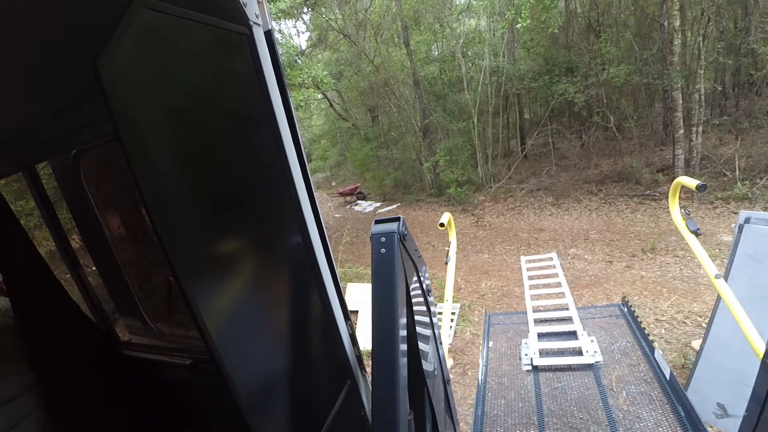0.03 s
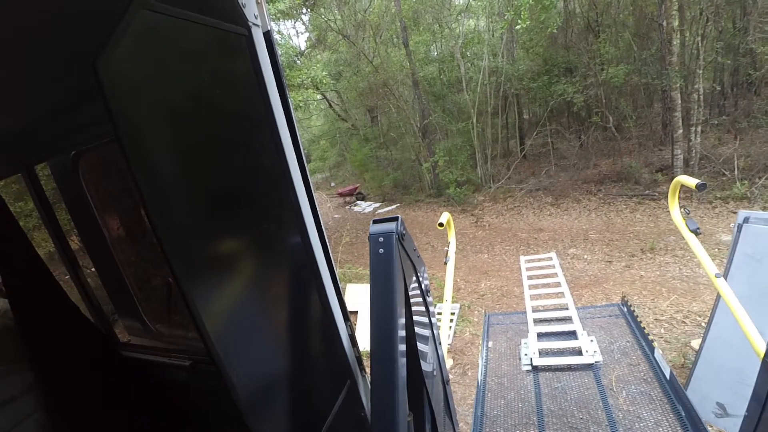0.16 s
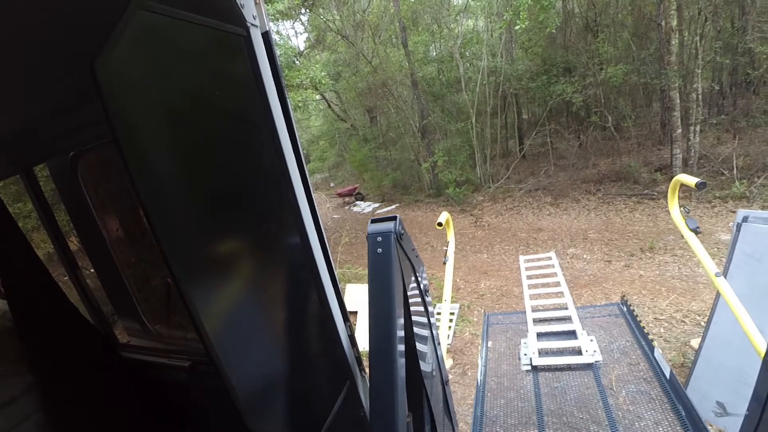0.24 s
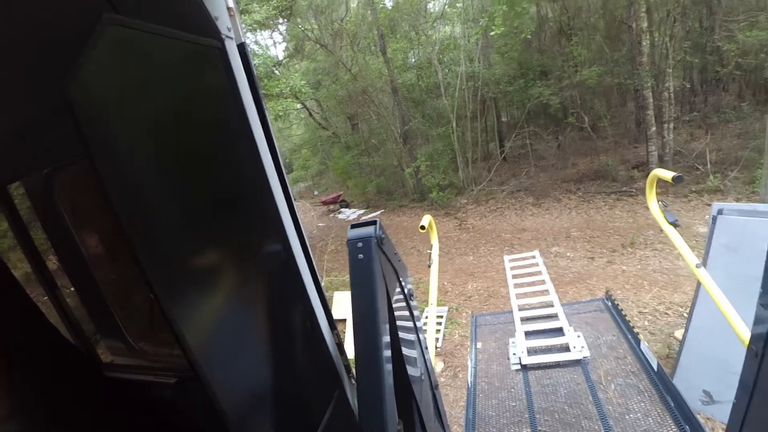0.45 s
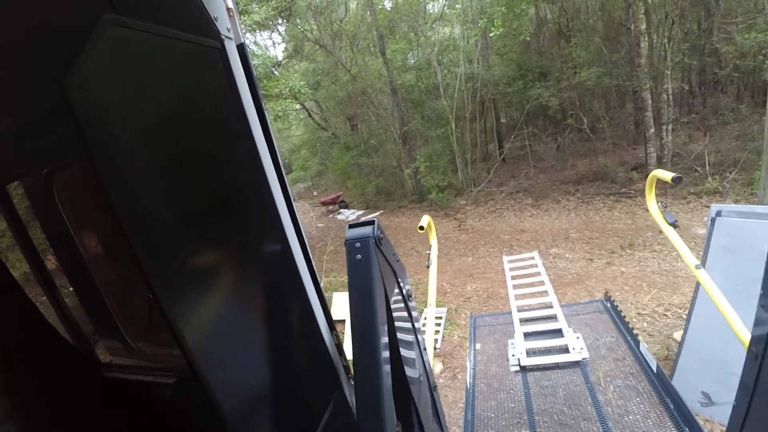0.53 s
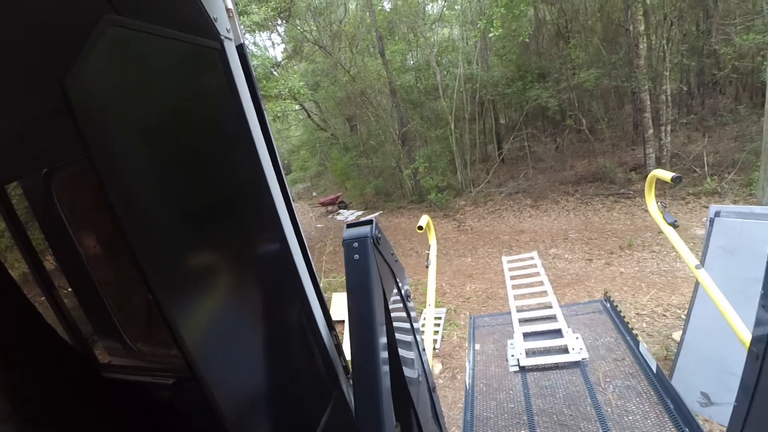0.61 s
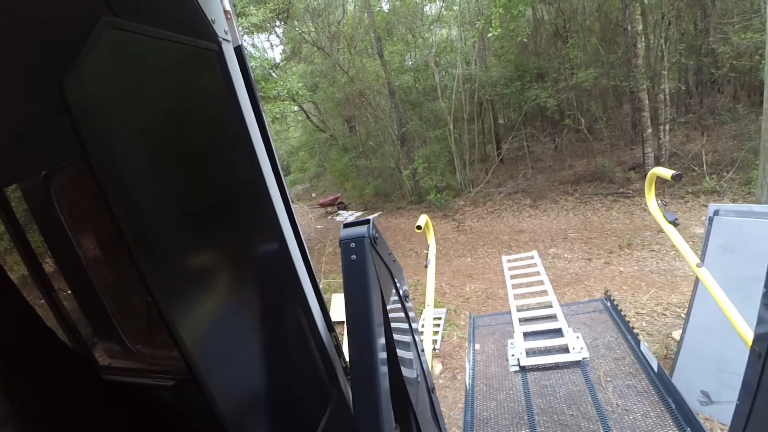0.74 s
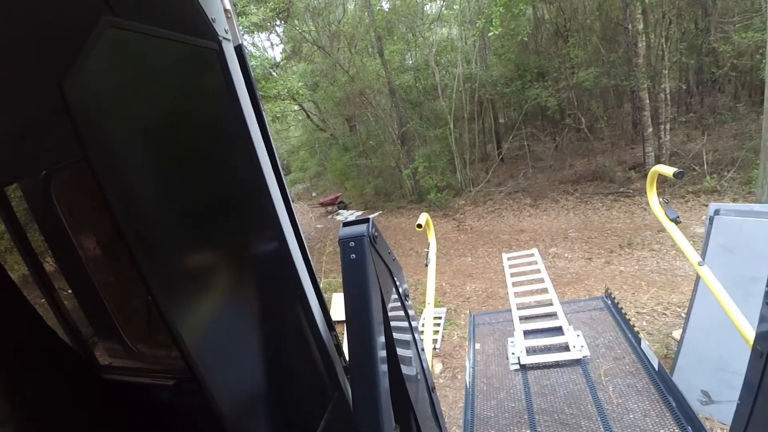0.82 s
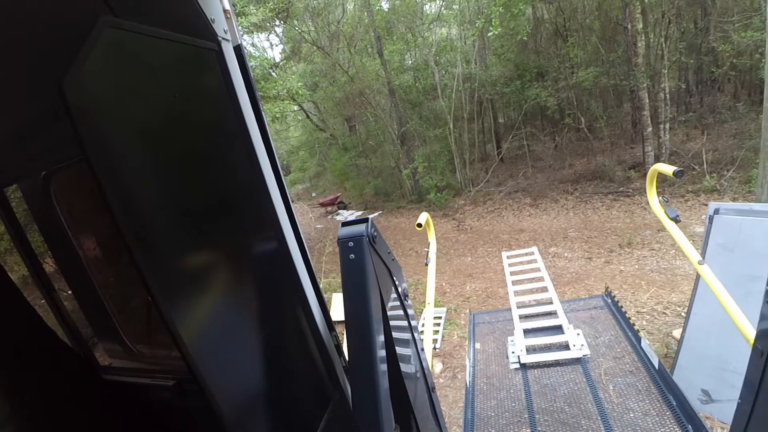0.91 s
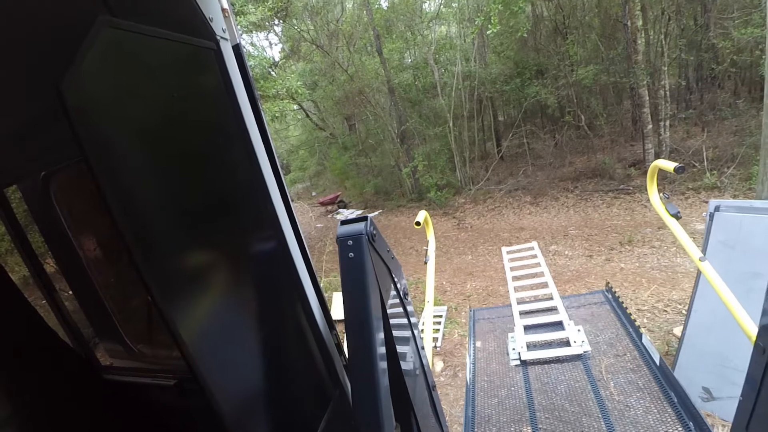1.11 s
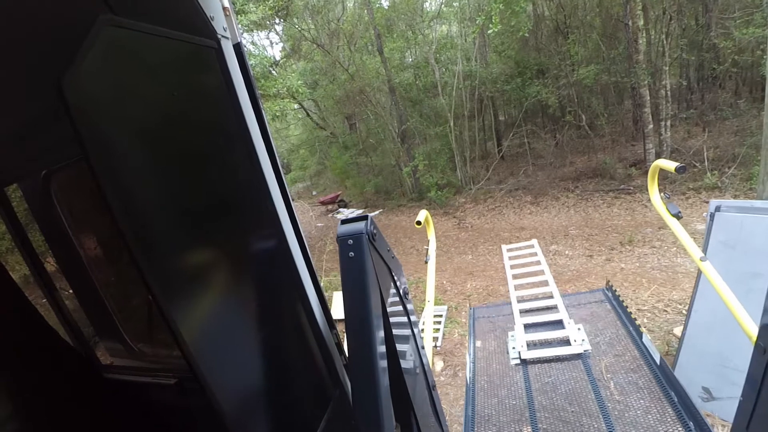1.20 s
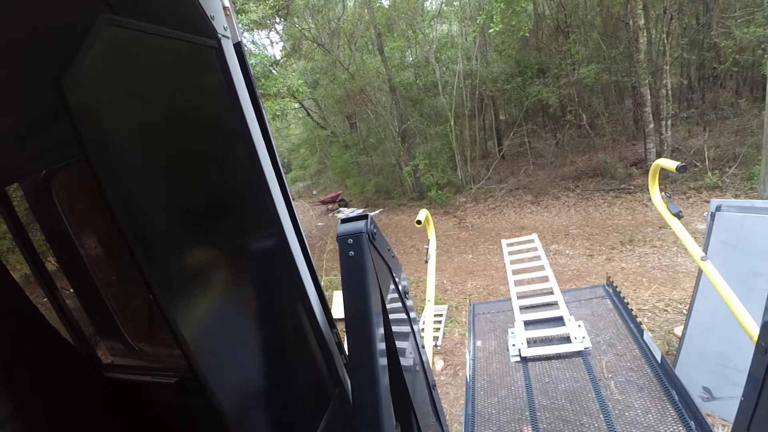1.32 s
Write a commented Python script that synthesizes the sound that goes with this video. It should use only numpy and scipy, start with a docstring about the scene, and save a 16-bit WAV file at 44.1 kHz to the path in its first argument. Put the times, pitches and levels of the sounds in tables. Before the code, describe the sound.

An electric motor driving a vehicle's lift platform starts with a switch click and rises to a whine by 0.3 seconds. Steel linkage clanks from 0.2 to 0.4 seconds, ending in a snap, with low body rumble. A chink comes at 0.5 and light knocks around 0.75. From 0.8 to about 1.4 seconds the motor sags in pitch and grinds under load, heard from the open doorway.

```python
"""Over a faint rumble a switch chinks, and the electric motor of a vehicle's lift platform spins up to a
whine, its gear and commutator tones all multiples of the shaft rate. The steel linkage clanks as the slack
is taken up, ringing the modes of the frame, and the vehicle's body rumbles after each jolt. A catch snaps,
joints chink and knock, and the motor sags and grinds as it takes the load.
Heard in mono from the open doorway."""
import sys
import numpy as np
from scipy.fft import rfft, irfft, next_fast_len
from scipy.io import wavfile
from scipy.ndimage import uniform_filter1d, map_coordinates

SR = 44100
rng = np.random.default_rng(int(sys.argv[2]) if len(sys.argv) > 2 else 0)


def bounce(signal):
    """Save signal as a 16-bit WAV file at the path given by the first command-line argument."""
    frames = np.transpose(np.atleast_2d(signal))
    limited = np.clip(frames, -1, 1)
    pcm = np.round(limited * 32767).astype(np.int16)
    wavfile.write(sys.argv[1], SR, pcm)


N = 59535

# envelope of the body's rumble (time [s], level [dB])
RUMBLE_ENVELOPE = [(0, -58), (.05, -44), (.19, -40), (.235, -24), (.38, -23), (.48, -27), (.58, -38),
                   (.72, -37), (.8, -25), (.9, -31), (1.05, -41), (1.13, -37), (1.35, -41)]
# light steel chinks, the first two from the switch (time [s], level [dB])
CHINKS = [(0.02, -48), (0.0466, -31), (0.5001, -22), (0.509, -25)]
# linkage impacts (time [s], frame level [dB], clatter level [dB])
CLANKS = [(.2135, -15.5, -17), (.2215, -19.5, -28), (.246, -58, -25), (.2885, -26, -16.5),
          (0.2935, -26, -14.5), (.3055, -10.5, -17), (.349, -26, -25), (.369, -22, -30)]
# lighter knocks of a joint as the load comes on (time [s], level [dB])
KNOCKS = [(0.715, -27.5), (0.728, -26), (0.746, -47), (.767, -27.5), (0.774, -30.5)]

# motor shaft (time [s], speed [turns/s])
SHAFT_SPEED = [(.04, 12), (.085, 34.5), (.11, 46), (.135, 54.5), (.155, 57.5), (.2, 70.3), (.24, 76.7),
               (.32, 80.5), (.4, 81.67), (.5, 82.03), (.6, 81.95), (.65, 81.72), (.76, 81.6), (.81, 80.8),
               (.88, 78.5), (.96, 75.1), (1.04, 72.8), (1.16, 70.3), (1.35, 68.8)]
# load on the shaft (time [s], share [0-1])
LOAD = [(.78, 0), (1.1, 0.61)]
# gear and commutator tones (order [cycles/turn])
WHINE_ORDERS = [6, 11, 18, 23, 30, 36, 60, 72, 81, 94, 107, 108, 109, 122, 144, 166, 180, 181, 216]
# strength of each of those tones (free-running level [dB], full-load level [dB])
WHINE_LEVELS = [(-46, -44.5), (-71.5, -36), (-56.5, -58), (-50, -47), (-95, -60), (-53.5, -49.5),
                (-71, -43.5), (-54.5, -48), (-56.5, -65.5), (-57, -53.5), (-83, -75), (-52.5, -64),
                (-64.5, -36), (-66.5, -56), (-57, -50.5), (-65, -57), (-64, -51), (-60, -53), (-74, -44)]
# envelope of the gear mesh during acceleration (time [s], level [dB])
MESH_ENVELOPE = [(.05, -52), (.085, -42), (.11, -43), (.142, -43), (.17, -53), (.22, -63)]
# motor effort, scaling buzz, hiss, hum and grind (time [s], gain [dB])
EFFORT = [(.04, 1), (.11, -2), (.2, 1.5), (.4, 2.5), (.6, 0), (.8, 0.5), (.95, -2), (1.15, -1.5),
          (1.35, -1)]

# resonances that the motor drives (frequency [Hz], width [Hz], gain [dB])
HOUSING_PEAKS = [(795, 70, 8), (1280, 110, 6), (5560, 130, 7), (8420, 90, 7), (8865, 100, 12),
                 (14700, 90, 6)]
COVER_PEAKS = [(795, 55, 12), (1275, 70, 10), (2690, 130, 12)]
PANEL_PEAKS = [(233.3, 10, -3.5), (441.3, 26.5, 5), (516, 35, -10), (576, 70, -5), (682, 86, -11.5),
               (760, 66, -14)]
GRIND_PEAKS = [(176, 53, 5.5), (488, 230, 0.5), (1190, 37, -20), (2126, 56, -1.5), (2410, 40, -2),
               (2700, 32, -1), (3200, 500, -7.5), (4920, 150, -4)]

# modes of the struck parts (frequency [Hz], relative level [dB], 60 dB decay time [s])
SWITCH_MODES = [(4200, -6, .15), (5700, 0, .22), (8220, -5, .2), (11000, -11, .2)]
FRAME_MODES = [(405.4, -13, 0.66), (476, -4, 0.15), (538.6, 0.5, 0.13), (663.3, 7, 0.076), (713, 7.5, 0.05),
               (815, -5.5, 0.22), (866, -3, 0.12), (950, -12, 0.17), (1182, -9.5, 0.21), (1612, -1, 0.042),
               (2002, -8, 0.082)]
CATCH_MODES = [(3600, -5, .011), (3920, 0, .015), (4150, -5, .011), (7000, -8, .009), (8000, -13, .009)]

# spectral shaping of the noisy sources (frequency [Hz], relative gain [dB])
RUMBLE_COLOUR = [(12, -20.5), (24, 8), (42, -3), (62, -11.5), (100, -8.5), (130, -12), (165, -25),
                 (400, -22.5), (1500, -67)]
CHINK_COLOUR = [(100, -10), (500, 6), (1200, -2), (2500, -1), (3600, 0.5), (4800, 3.5), (6500, -5),
                (8500, -15), (11000, -10.5), (16000, -31)]
BUZZ_COLOUR = [(30, -11), (300, -25), (450, 10.5), (700, 2.5), (1100, -9.5), (2500, -16.5), (4000, -8.5),
               (8000, -15), (10000, -12), (16000, -25)]
HISS_COLOUR = [(30, -19), (280, -14), (440, -1.5), (750, -2.5), (1100, -6), (2500, -12.5), (5000, -19.5),
               (8200, -15), (9500, -25), (16000, -21.5)]
CLATTER_COLOUR = [(60, -11), (250, 2), (450, 17), (800, 6.5), (1100, 6.5), (2000, 3.5), (3700, -0.5),
                  (5000, -5.5), (8000, -13), (11000, -22.5), (16000, -33)]
KNOCK_COLOUR = [(100, -27), (250, -5), (600, 8.5), (980, 8), (1350, 3), (1900, -0.5), (2800, -5),
                (4500, -7.5), (7000, -18), (14000, -45)]

ON_S, ON_RISE_S = 0.039, 0.0051
FULL_SPEED = 80  # turns/s
JITTER, LOAD_JUDDER = .0004, .0028  # shares of shaft speed
FLUTTER_DB, LOAD_FLUTTER_DB = 1.8, 1.2
BUZZ_DB, HISS_DB, HUM_DB, GRIND_DB = -41, -38.5, -41, -34.5


def amp(db):
    """Amplitude ratio of a level in decibels."""
    return 10 ** (np.asarray(db) / 20)


def unit(x):
    """Normalisation to rms 1."""
    return x / np.sqrt(np.mean(x ** 2) + 1e-20)


def curve(rows):
    """Linear interpolation of (time [s], value) points at every sample."""
    return np.interp(np.arange(N) / SR, *np.transpose(rows))


def since(start):
    """Elapsed time in seconds, zero before start."""
    return np.maximum(np.arange(N) / SR - start, 0)


def wobble(rate):
    """Smooth random modulation: a spline through rate knots a second."""
    return map_coordinates(rng.standard_normal(1024), [np.arange(N) * rate / SR], mode="mirror")


def filtered(x, response):
    """Linear filtering: the spectrum is multiplied by a frequency response."""
    size = next_fast_len(N + SR // 4)
    return irfft(rfft(x, size) * response(np.fft.rfftfreq(size, 1 / SR)), size)[:N]


def coloured(x, colour):
    """Spectral shaping by (frequency [Hz], gain [dB]) points, at rms 1."""
    hz, db = np.transpose(colour)
    return unit(filtered(x, lambda f: amp(np.interp(np.log(f + 1), np.log(hz + 1), db))))


def resonant_noise(peaks):
    """Random excitation of resonances, at rms 1."""
    response = lambda f: sum(amp(db) / (1 + 1j * (f - hz) / width) ** 2 for hz, width, db in peaks)
    return unit(filtered(rng.standard_normal(N), response))


def burst(start, colour, rise_s, t60):
    """Modal overlap: dense metal ringing merges into exponentially decaying noise."""
    t = since(start)
    envelope = (1 - np.exp(-t / rise_s)) * np.exp(-np.log(1000) * t / t60)
    return envelope * coloured(rng.standard_normal(N), colour)


def ring(start, modes, rise_s):
    """Free vibration: a struck part sounds as a sum of damped sinusoids."""
    t = since(start)
    partials = sum(amp(db) * np.exp(-np.log(1000) * t / t60) * np.sin(2 * np.pi * (hz * t + rng.random()))
                   for hz, db, t60 in modes)
    return partials * (1 - np.exp(-t / rise_s))


def body_rumble():
    """Low-frequency random vibration of the vehicle's body swells after each jolt."""
    return amp(curve(RUMBLE_ENVELOPE)) * coloured(rng.standard_normal(N), RUMBLE_COLOUR)


def steel_chinks():
    """Brief contacts in the switch and joints excite a broad, bright band of modes."""
    return sum(amp(db) * burst(start, CHINK_COLOUR, rise_s=.0007, t60=0.12) for start, db in CHINKS)


def switch_ring():
    """The switch's metal rings briefly at its natural frequencies."""
    return amp(-42) * ring(ON_S, SWITCH_MODES, ON_RISE_S)


def whine(speed, turns, load):
    """Gear and commutator harmonics of the shaft rate swell as they cross housing resonances."""
    tones = np.zeros(N)
    for order, (free_db, loaded_db) in zip(WHINE_ORDERS, WHINE_LEVELS):
        level_db = free_db + load * (loaded_db - free_db)
        lift_db = sum(db / (1 + (2 * (order * speed - hz) / width) ** 2) for hz, width, db in HOUSING_PEAKS)
        flutter_db = (FLUTTER_DB + LOAD_FLUTTER_DB * load) * wobble(39.2)
        harmonic = np.sqrt(2) * np.sin(2 * np.pi * (order * turns + rng.random()))
        tones += amp(level_db + lift_db + flutter_db) * harmonic
    # amplitude grows as the fourth power of speed running free, less steeply under load
    return tones * (speed / FULL_SPEED) ** (4 * (1 - load))


def gear_mesh(turns, order=23):
    """Swept excitation: the rising mesh tone and its octave ring one cover after another."""
    phase = 2 * np.pi * order * turns
    envelope = amp(curve(MESH_ENVELOPE) + FLUTTER_DB * wobble(140))
    mesh = envelope * (np.sin(phase) + amp(-11) * np.sin(2 * phase))
    covers = lambda f: 1 + sum(amp(db) / (1 + 2j * (f - hz) / width) for hz, width, db in COVER_PEAKS)
    return filtered(mesh, covers)


def reflected(x, count=10, longest_s=.022, each_db=-17):
    """Interference with reflections off the door and platform makes a gliding tone ripple."""
    delays = longest_s * rng.random(count)
    return filtered(x, lambda f: 1 + amp(each_db) * sum(np.exp(-2j * np.pi * f * d) for d in delays))


def surface_buzz(turns, harmonics=200, points=4800):
    """Periodic excitation: the same roughness of the running surfaces comes round on every turn."""
    spectrum = rng.rayleigh(size=harmonics) * np.exp(2j * np.pi * rng.random(harmonics))
    roughness = irfft(spectrum, points)
    return coloured(np.interp(turns, np.arange(points) / points, roughness, period=1), BUZZ_COLOUR)


def motor():
    """Forced vibration: the motor whines and buzzes, its brushes hiss, panels hum and the load adds grind."""
    load = curve(LOAD)
    unsteadiness = JITTER * wobble(50) + LOAD_JUDDER * load * wobble(170)
    speed = uniform_filter1d(curve(SHAFT_SPEED), size=600) * (1 + unsteadiness)
    turns = np.cumsum(speed) / SR
    buzz = amp(BUZZ_DB) * surface_buzz(turns) * speed / FULL_SPEED
    hiss = amp(HISS_DB) * coloured(rng.standard_normal(N), HISS_COLOUR)
    hum = amp(HUM_DB) * resonant_noise(PANEL_PEAKS)
    grind = amp(GRIND_DB) * load * resonant_noise(GRIND_PEAKS)
    tones = reflected(whine(speed, turns, load) + gear_mesh(turns))
    onset = 1 - np.exp(-since(ON_S) / ON_RISE_S)
    return onset * (tones + amp(curve(EFFORT)) * (buzz + hiss + hum + grind))


def linkage_clanks(rise_s=.003):
    """Impact excitation: each clank rings the frame's modes and rattles the loose steel on it."""
    clanks = np.zeros(N)
    for start, frame_db, clatter_db in CLANKS:
        clanks += amp(frame_db - 3) * ring(start, FRAME_MODES, rise_s)
        clanks += amp(clatter_db) * burst(start, CLATTER_COLOUR, rise_s, t60=0.16)
    return clanks


def catch_snap(start=.3742):
    """Heavy damping cuts the catch's high modes and crack of noise to a dry snap."""
    modes = ring(start, CATCH_MODES, rise_s=0.00017)
    crack = amp(-9) * burst(start, CHINK_COLOUR, rise_s=.0002, t60=.008)
    return amp(-11) * (modes + crack)


def joint_knocks():
    """Light impacts excite a joint's dense mid-range modes as the load comes on."""
    return sum(amp(db) * burst(start, KNOCK_COLOUR, rise_s=0.0011, t60=0.12) for start, db in KNOCKS)


def scene():
    """Superposition of all sources, alike in both channels."""
    mono = body_rumble() + steel_chinks() + switch_ring() + motor()
    mono += linkage_clanks() + catch_snap() + joint_knocks()
    return np.tile(mono, (2, 1))


def record(dry, cutoff_hz=15450):
    """Band limiting: an ideal low-pass filter removes the highest treble."""
    return np.array([filtered(channel, lambda f: f < cutoff_hz) for channel in dry])


dry = scene()
out = record(dry)
bounce(out)
```